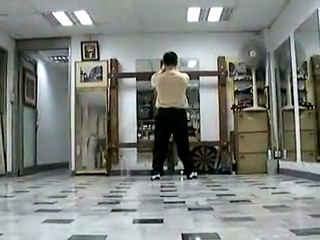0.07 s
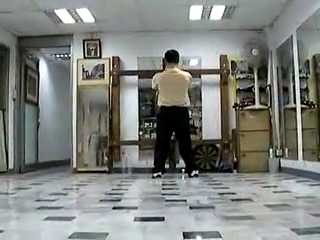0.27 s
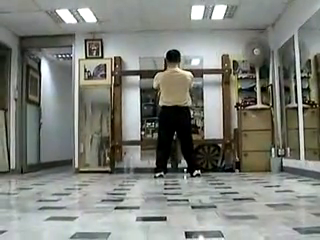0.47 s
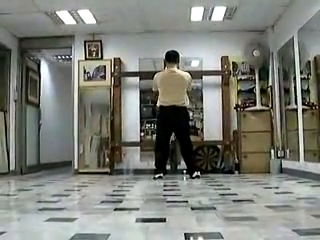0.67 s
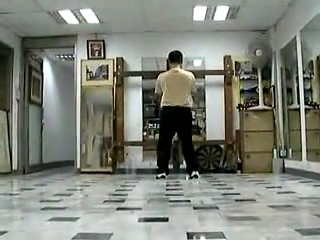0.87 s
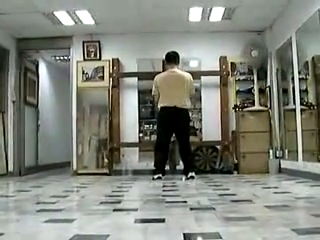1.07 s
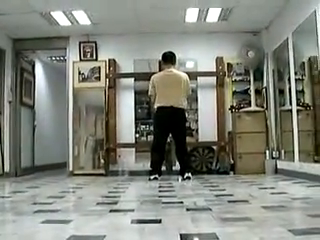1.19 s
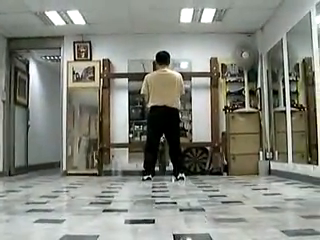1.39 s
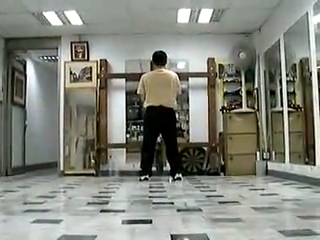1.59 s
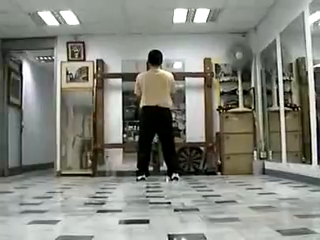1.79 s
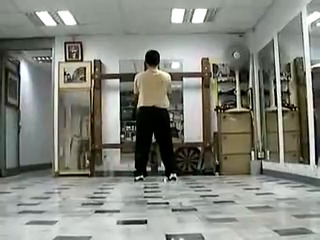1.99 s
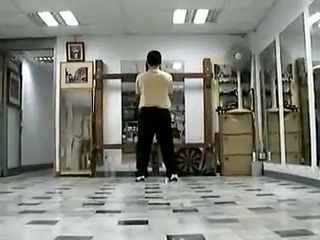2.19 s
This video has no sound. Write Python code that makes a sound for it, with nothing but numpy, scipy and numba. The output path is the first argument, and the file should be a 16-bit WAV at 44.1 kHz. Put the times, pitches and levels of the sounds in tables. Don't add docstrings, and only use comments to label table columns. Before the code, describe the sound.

A wooden training dummy is struck by hands: at 0.2 s skin slaps and a full hollow boom near 240 Hz, damped by 0.35 s, then loose knocks until 0.5. Light slaps and knocks follow around 0.8 and 1.25. At 1.6 a loud, dull close bump with dry clicks hits the microphone. From 1.8 to 2.1 come a slap and clustered knocks. Short tiled reverberation, low ventilation hum, faint cloth rustle.

```python
import sys
import numpy as np
from scipy import signal
from scipy.io import wavfile
from scipy.ndimage import uniform_filter1d
from numba import njit

SR = 44100
rng = np.random.default_rng(int(sys.argv[2]) if len(sys.argv) > 2 else 0)


def how_loud(loudness_db):
    steps = np.asarray(loudness_db, float) / 20
    return 10 ** steps


def generate_wav(signal):
    frames = np.transpose(np.atleast_2d(signal))
    scaled = np.clip(frames, -1, 1) * 32767
    pcm = np.round(scaled).astype(np.int16)
    wavfile.write(sys.argv[1], SR, pcm)


N = 99225

# pitch_hz [Hz], level_db [dB per Hz]
VENTILATION = [(40, -15), (120, -7.5), (250, -4), (320, -14), (430, -21.5), (620, -15.5), (1300, -16),
               (6500, -28)]
# pitch_hz [Hz], width_hz [Hz], level_db [dB]
ROOM_HUM = [(122.4, 18.2, -37), (200, 32, -36), (242.1, 44, -38), (304.6, 15, -40)]
# middle_s [s], level_db [dB], half_length_s [s]
CLOTH_RUSTLES = [(0.032, -52, 0.086), (0.24, -28.5, 0.048), (0.311, -48, 0.064), (0.58, -52.5, .08),
                 (0.744, -39.5, 0.083), (1.09, -51.5, 0.066), (1.268, -32.5, 0.013), (1.331, -46.5, 0.1),
                 (1.613, -47, 0.036), (1.674, -43.5, 0.097), (1.825, -33, 0.02), (2.232, -48, 0.042)]
# start_s [s], level_db [dB], centre_hz [Hz], t60_s [s], left_right_db [dB]
SHELL_TICKS = [
    (1.5743, -15, 7000, .005, 1),
    (1.6116, -27, 5000, .005, 0),
    (1.6232, -8, 1800, .0045, -3),
    (1.6237, -11, 600, .03, -2),
    (1.6812, -19, 1900, .008, -2),
    (1.7032, -26, 800, .015, 0),
]
# start_s [s], level_db [dB], pitch_hz [Hz], t60_s [s], left_right_db [dB]
SHELL_THUMPS = [
    (1.6065, -15.5, 150, 0.14, 6),
    (1.611, -22, 159, 0.031, 2),
    (1.615, -37, 183, 0.033, 7),
    (1.6219, 6.5, 198, 0.046, 5),
    (1.6266, 2.5, 85, 0.048, 6),
    (1.6258, -4.5, 306, 0.043, 9.5),
    (1.7033, -5, 142, 0.016, -2),
]
# start_s [s], level_db [dB], centre_hz [Hz], contact_s [s], dull_db [dB]
SKIN_SLAPS = [(0.187, -21.5, 2460, .026, -9.5), (0.224, -17.5, 2000, 0.021, -0.5),
              (.238, -19, 1890, 0.017, -14), (0.622, -41, 4030, 0.19, -11), (0.773, -29.5, 3200, 0.015, -2),
              (0.861, -45.5, 3000, 0.02, 7), (1.253, -26.5, 3150, 0.012, -35),
              (1.809, -19, 5600, 0.019, -13.5), (1.814, -26, 2550, 0.021, -3),
              (1.859, -39, 3000, 0.079, -9.5), (.04, -66, 4100, 0.07, 21)]
# pitch_hz [Hz], level_db [dB], t60_s [s]
TRUNK_MODES = [(238.5, -.5, 4), (243, -5, .2), (172, -13, .5), (298, -9, .35), (194, -12, .16),
               (128, -15, .25), (505, -17, .35), (570, -20, .3), (810, -20, .17), (400, -21, .35),
               (1841, -24, .11), (2110, -25, .12), (1540, -23, .11)]
# start_s [s], level_db [dB], pitch_hz [Hz], t60_s [s]
TRUNK_KNOCKS = [(.385, -11, 236, 0.11), (.465, -19, 242.6, 0.22), (.525, -20, 241, 0.2),
                (0.761, -20, 247.7, 0.088), (0.86, -20, 200, 0.12), (1.26, -17, 224, 0.072),
                (1.862, -13, 215, 0.17), (1.892, -15.5, 250, 0.16), (1.917, -16, 193, 0.15),
                (1.943, -12, 208.4, 0.14), (1.975, -12, 233, 0.17), (2.031, -44, 236, .15),
                (2.075, -18, 220, 0.12)]

NOTCH_HZ, NOTCH_WIDTH_HZ = 7620, 2420
PORT_HZ, PORT_WIDTH_HZ = 9860, 2320


def level(x, db):
    return x * how_loud(db) / np.sqrt(np.mean(x ** 2))


def band(x, hz, width_hz):
    return signal.lfilter(*signal.iirpeak(hz, hz / min(width_hz, SR / 3), fs=SR), x)


def double_band(x, hz, width_hz):
    return band(band(x, hz, width_hz), hz, width_hz)


def since(s):
    return np.maximum(np.arange(N) / SR - s, 0)


def ring(s, hz, t60_s, rise_s):
    t = since(s)
    return (1 - np.exp(-t / rise_s)) * how_loud(-60 * t / t60_s) * np.sin(2 * np.pi * hz * t)


def pair(n, alike_hz):
    mid, side = rng.standard_normal((2, n))
    side = signal.lfilter(*signal.butter(1, alike_hz, "high", fs=SR), side)
    return np.array([mid + side, mid - side])


def walk(rate_hz):
    k = int(SR / rate_hz)
    steps = np.repeat(rng.standard_normal(N // k + 1), k)
    return 0.81 * uniform_filter1d(uniform_filter1d(steps, k), k)[:N]


def ventilation():
    alike_hz = 250
    rush, swell = 0, walk(4.5)
    table_hz, table_db = np.array(VENTILATION).T
    for hz in 40 * 2 ** (np.arange(23) / 3):
        db = np.interp(np.log(hz), np.log(table_hz), table_db) + 0.29 * swell + 1.1 * walk(9.12)
        rush = rush + how_loud(db) * double_band(pair(N, alike_hz), hz, hz / 4)
    hum = 0
    for hz, width_hz, db in ROOM_HUM:
        tone = level(double_band(pair(N, alike_hz), hz, width_hz), db)
        hum = hum + tone * how_loud(1.4 * walk(6.6))
    return level(rush, -29) + hum


def port_hiss():
    t = np.arange(N) / SR
    swell = how_loud(-54.5 + 0.51 * walk(11.9))
    for middle_s, db, half_s in CLOTH_RUSTLES:
        swell = swell + how_loud(db) * np.exp(-((t - middle_s) / half_s) ** 2)
    return swell * level(double_band(pair(N, 4000), PORT_HZ, PORT_WIDTH_HZ), 0)


def camera_bump():
    scrape_s, scrape_hz, scrape_db, scrape_rise_s = 1.6225, 2000, -23.5, 0.027
    click_db, thump_rise_s = 6, 0.00033
    side = np.array([[.5], [-.5]])
    before = scrape_s - np.arange(N) / SR
    scrape = level(band(pair(N, 1500), scrape_hz, 2 * scrape_hz), scrape_db)
    out = scrape * (before > 0) * np.exp(-np.abs(before) / scrape_rise_s)
    for s, db, hz, t60_s, pan_db in SHELL_TICKS:
        click = how_loud(click_db) * (np.arange(N) == int(s * SR) + 1)
        click = band(click * SR / (4 * hz), hz, 2 * hz)
        tick = level(band(pair(N, 6000), hz, 2 * hz), 0) + click
        out = out + how_loud(db + pan_db * side) * tick * (since(s) > 0) * how_loud(-60 * since(s) / t60_s)
    for s, db, hz, t60_s, pan_db in SHELL_THUMPS:
        out = out + how_loud(db + pan_db * side) * 2 * side * ring(s, hz, t60_s, thump_rise_s)
    main_hit_s = SHELL_TICKS[2][0]
    shell = ring(main_hit_s, 1157, 0.023, 0.00027)
    return out + shell * np.array([[.3], [1]])


def skin_slaps():
    rise_share, relative_width = .25, 1.3
    dull_hz, grain_db, top_hz = 1200, 2.5, 6800
    out = 0
    for s, db, hz, contact_s, dull_db in SKIN_SLAPS:
        t = since(s)
        grit = rng.standard_normal(N) * how_loud(grain_db * walk(400))
        bright = level(double_band(grit, hz, relative_width * hz), 0)
        dull = level(band(grit, dull_hz, dull_hz), dull_db)
        shape = (1 - np.exp(-t / (rise_share * contact_s))) * np.exp(-(t / contact_s) ** 2)
        out = out + how_loud(db) * (bright + dull) * shape
    return signal.sosfilt(signal.butter(6, top_hz, fs=SR, output="sos"), out)


def wooden_trunk():
    blow_s, blow_rise_s, damped_s, damped_t60_s = .2255, .006, .333, .13
    knock_rise_s, low_hz, low_db = 0.0027, 120.3, -10.5
    blow = -sum(how_loud(db) * ring(blow_s, hz, t60_s, blow_rise_s) for hz, db, t60_s in TRUNK_MODES)
    out = blow * how_loud(-60 * since(damped_s) / damped_t60_s)
    for s, db, hz, t60_s in TRUNK_KNOCKS:
        low = how_loud(low_db) * ring(s, low_hz, t60_s, knock_rise_s)
        out = out + how_loud(db) * (ring(s, hz, t60_s, knock_rise_s) + low)
    return out


def tiled_room(x):
    t60_s, damp_hz, alike_hz = 0.37, 4660, 3000
    t = np.arange(SR // 2) / SR
    tail = pair(len(t), alike_hz) * how_loud(-60 * t / t60_s)
    tail = signal.lfilter(*signal.butter(1, damp_hz, fs=SR), tail)
    return signal.fftconvolve(x[None], tail / np.sqrt(np.sum(tail[0] ** 2)), axes=1)[:, :N]


def scene():
    skin, wood = skin_slaps(), wooden_trunk()
    tail = tiled_room(how_loud(7.5) * skin + how_loud(-17) * wood)
    return skin + wood + tail + camera_bump() + ventilation() + port_hiss()


@njit
def follow(x, attack, release):
    y, e = np.empty(len(x)), 0.
    for i in range(len(x)):
        e += (x[i] - e) * (attack if x[i] > e else release)
        y[i] = e
    return y


def gain_control(x):
    top, ratio, attack_s, release_s = .4, 1.6, .004, .2
    e = follow(np.abs(x).max(axis=0), 1 / (attack_s * SR), 1 / (release_s * SR))
    return x * np.minimum(top / (e + 1e-9), 1) ** (1 - 1 / ratio)


def treble_gate(x):
    from_hz, gate_db, port_db, scatter_db, frame = 5000, -71.5, 1.5, 4, 1536
    ms = np.array([x[0] + x[1], x[0] - x[1]]) / 2
    hz, frames, z = signal.stft(ms, SR, nperseg=frame)
    waver = np.repeat(rng.standard_normal((2, 100, len(frames))), 8, axis=1)[:, :len(hz)]
    bar_db = gate_db + port_db * (hz[:, None] > NOTCH_HZ) + scatter_db * waver
    size = np.abs(z) / how_loud(bar_db)
    z = z * np.where(hz[:, None] > from_hz, 1 / (1 + (size + 1e-9) ** -20), 1)
    mid, side = signal.istft(z, SR, nperseg=frame)[1][:, :N]
    return np.array([mid + side, mid - side])


def roll_off(x):
    return signal.sosfilt(signal.butter(12, 11600, fs=SR, output="sos"), x)


def record(dry):
    x = dry - band(dry, NOTCH_HZ, NOTCH_WIDTH_HZ)
    x = signal.sosfilt(signal.ellip(8, .2, 60, 11150, fs=SR, output="sos"), x)
    x = treble_gate(gain_control(x))
    return roll_off(np.clip(x, -1, 1))


dry = scene()
out = record(dry)
generate_wav(out)
```